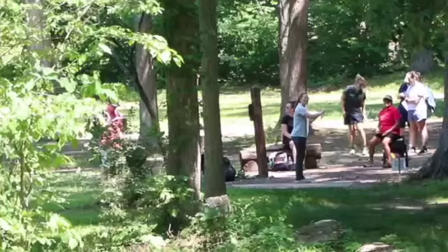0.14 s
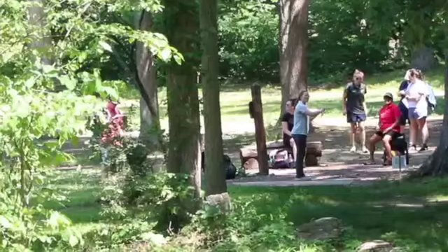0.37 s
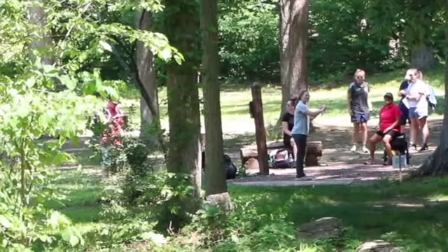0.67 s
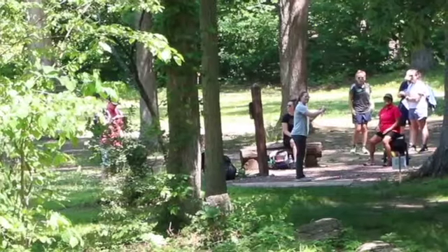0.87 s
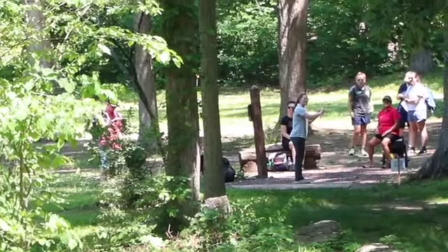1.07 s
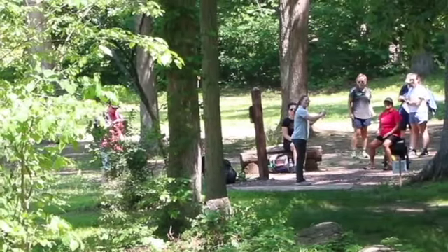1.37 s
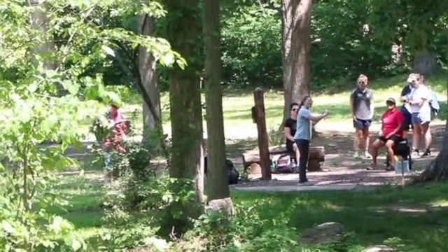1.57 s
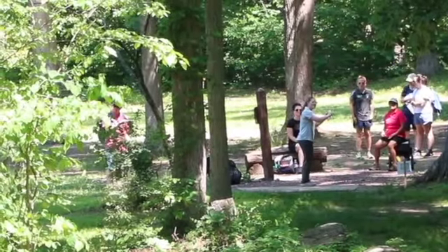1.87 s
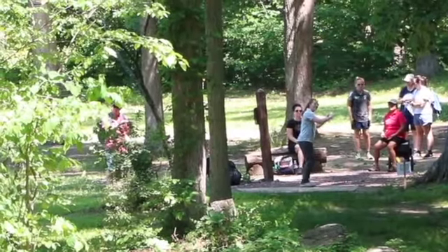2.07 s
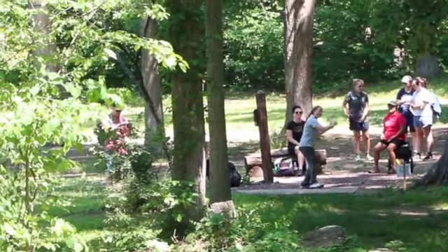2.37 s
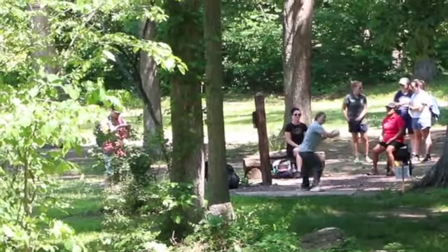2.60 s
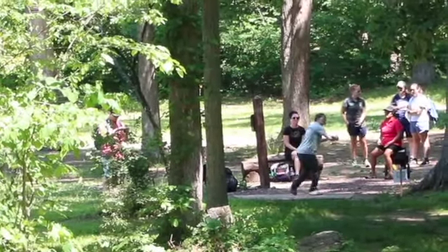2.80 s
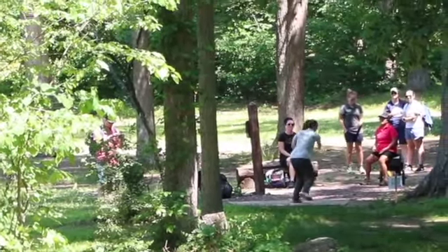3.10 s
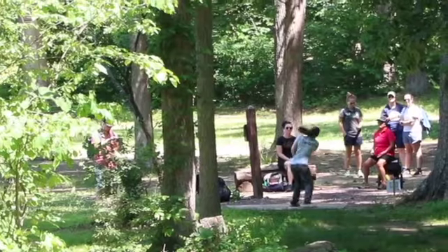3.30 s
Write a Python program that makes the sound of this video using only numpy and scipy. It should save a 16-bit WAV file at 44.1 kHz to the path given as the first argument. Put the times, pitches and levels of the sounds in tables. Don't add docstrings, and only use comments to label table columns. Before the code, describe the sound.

A steady, slightly throbbing cicada chorus fills leafy woods from all sides. Quiet birds chirp on the left, a very faint distant engine swells and fades, and soft rumble lies beneath in an outdoor stereo pickup.

```python
import sys
import numpy as np
from scipy import signal
from scipy.fft import rfft, irfft
from scipy.io import wavfile
from scipy.ndimage import uniform_filter1d

SR = 44100
rng = np.random.default_rng(int(sys.argv[2]) if len(sys.argv) > 2 else 0)


def undo_db(level):
    steps = np.asarray(level, float) / 20
    return 10 ** steps


def persist_wave(psi):
    counts = np.round(np.clip(psi, -1, 1) * 32767).astype(np.int16)
    wavfile.write(sys.argv[1], SR, np.atleast_2d(counts).T)


N = 152145
TIME = np.arange(N) / SR
HZ = np.arange(N // 2 + 1) * SR / N + 1e-3


def level(x, db):
    return x * undo_db(db) / np.sqrt(np.mean(x ** 2))


def ring(hz, width):
    return (1 + 1j * (HZ - hz ** 2 / HZ) / width) ** -2


def walk(rate):
    hold = int(SR / rate)
    values = rng.standard_normal(N // 100 + 2)[:N // hold + 1]
    slewed = uniform_filter1d(np.repeat(values, hold), hold)
    return 1.57 * uniform_filter1d(slewed, hold)[:N]


def leaf_scatter(wet_db):
    t60_s = 0.098
    size = SR // 4
    tail = rng.standard_normal((2, size)) * undo_db(-60 * np.arange(size) / SR / t60_s)
    tail = tail / np.sqrt(np.sum(tail ** 2, axis=1, keepdims=True))
    return undo_db(wet_db) * rfft(tail, N)


def drum_clicks(rate, tone):
    jitter, scatter_db = 0.35, 2.5
    chance = rng.standard_normal((2, 2000))
    at = np.cumsum(np.exp(jitter * chance[0] + 0.1 * tone)) / rate - 0.01
    keep = (at > 0) & (at * SR < N)
    return np.bincount((at[keep] * SR).astype(int), undo_db(scatter_db * chance[1][keep]), N)


def crowd(hz, spread_hz, width, rate, db, throb_db, pan_db, wet_db, count):
    port_lag_s, unison = 0.00025, 0.27
    total = np.zeros((2, len(HZ)), complex)
    leaves = leaf_scatter(wet_db)
    places = rng.permutation(np.linspace(-1, 1, count))
    tones = np.sinh(np.linspace(-1.6, 1.6, count))
    for place, tone in zip(places, tones):
        throbbing = drum_clicks(rate, tone) * undo_db(throb_db * walk(11))
        song = rfft(throbbing) * ring(hz + spread_hz * tone, width)
        lag = np.exp(1j * np.pi * HZ * place * port_lag_s)
        direct = np.array([lag, 1 / lag])
        total += song * (direct + np.roll(leaves, rng.integers(len(HZ)), axis=1))
    pulse = walk(14)
    together = undo_db(throb_db * unison * (pulse - uniform_filter1d(pulse, size=SR // 3)))
    return level(irfft(total, N) * together, db) * undo_db(np.array([[pan_db], [-pan_db]]) / 2)


# belly f/Hz, belly spread/Hz, ring width/Hz, click rate/Hz, level/dB, throb/dB,
# left over right/dB, scattered over direct/dB
DRONE = (1316, 18.5, 110, 140, -24, 1.1, 1.1, -3.5)
DRONE_EDGE = (1302.5, 68.5, 208, 139.5, -28.5, 1, 1, -11)
HUM = (899, 44, 57, 110, -44, 1, 2, -6.5)


def low_cicadas():
    return crowd(*DRONE, count=32) + crowd(*DRONE_EDGE, count=24) + crowd(*HUM, count=14)


# belly f/Hz, belly spread/Hz, ring width/Hz, click rate/Hz, level/dB, throb/dB,
# left over right/dB, scattered over direct/dB
HISS_LOW = (5990, 241, 1196, 420, -41.5, 1.5, 0, 8)
HISS_HIGH = (7929, 351, 1302, 420.5, -39.5, 3, -1.8, 15.5)
HISS_DEEP = (4350, 283, 896, 420, -44, 1.5, -.3, 6)


def hissing_cicadas():
    return crowd(*HISS_LOW, count=14) + crowd(*HISS_HIGH, count=16) + crowd(*HISS_DEEP, count=10)


def whistle(rows):
    s, hz, db = np.array(rows, float).T
    gate = uniform_filter1d(((TIME > s[0]) & (TIME < s[-1])) * 1., size=150)
    phase = 2 * np.pi * np.cumsum(np.interp(TIME, s, hz)) / SR
    return np.sqrt(2) * gate * undo_db(np.interp(TIME, s, db)) * np.sin(phase)


# t/s, f/Hz, level/dB
PHRASES = [
    [(1.698, 4700, -56), (1.706, 3600, -46), (1.718, 3050, -47), (1.73, 2830, -47), (1.742, 3150, -45),
     (1.754, 3900, -44), (1.775, 3980, -51), (1.825, 3950, -54)],
    [(1.83, 5000, -55), (1.838, 3900, -44), (1.847, 3550, -39), (1.856, 3700, -56), (1.866, 3200, -48),
     (1.876, 2850, -45), (1.888, 3700, -45), (1.904, 4250, -50)],
    [(1.97, 2700, -48), (1.99, 2620, -44), (2.002, 2470, -42), (2.012, 2250, -52), (2.02, 2500, -46),
     (2.035, 3050, -37), (2.054, 3580, -37), (2.062, 4150, -48)],
    [(2.064, 3800, -50), (2.071, 3050, -40), (2.088, 2300, -46), (2.1, 2310, -46), (2.115, 2430, -40),
     (2.135, 2560, -45), (2.152, 2470, -54), (2.18, 2500, -45), (2.222, 2440, -53)],
    [(3.386, 5100, -52), (3.393, 4200, -43), (3.402, 3350, -39), (3.412, 2700, -44), (3.425, 3100, -36),
     (3.438, 3650, -36), (3.45, 4400, -41)],
]


def songbird():
    return sum(whistle(rows) for rows in PHRASES)


# t/s, length/s, start f/Hz, end f/Hz, level/dB
FAR_NOTES = [(.035, .05, 3250, 2950, -53), (.48, .09, 2180, 2320, -53), (.68, .1, 2760, 2750, -55),
             (.85, .05, 3250, 2980, -52), (1.35, .1, 2130, 2270, -52), (1.54, .06, 2260, 2220, -53),
             (1.81, .05, 3250, 2950, -50), (1.88, .02, 2350, 2150, -49), (2.89, .06, 2750, 2750, -56),
             (3.075, .02, 2350, 2380, -51), (3.1, .05, 2750, 2720, -55), (3.264, .02, 2350, 2380, -46),
             (3.284, .016, 2800, 2820, -47), (3.39, .03, 2100, 1980, -52)]


def far_birds():
    song = 0
    for s, length, start_hz, end_hz, db in FAR_NOTES:
        bend = (s + 0.388 * length, 0.37 * start_hz + 0.6 * end_hz, db)
        song = song + whistle([(s, start_hz, db - 5), bend, (s + length, end_hz, db)])
    return song


def birds_among_trunks():
    right_db, lag, wet_db, t60_s = -14, 6, -7, 0.65
    song = (songbird() + far_birds()) * undo_db(5 + 0.5 * walk(70))
    t = np.arange(SR) / SR
    tail = rng.standard_normal((2, SR)) * undo_db(-60 * t / t60_s) * np.clip(t / 0.013, 0, 1)
    wet = signal.fftconvolve(song[None], level(tail, 0) / np.sqrt(SR), axes=1)[:, :N]
    direct = np.array([song, undo_db(right_db) * np.pad(song, (lag, 0))[:N]])
    return direct + undo_db(wet_db) * wet


# t/s, centre f/Hz, level/dB
ENGINE = [
    (0, 180, -63),
    (0.798, 240, -61),
    (1.05, 330, -55),
    (1.299, 374.8, -53),
    (1.6, 403.6, -56),
    (1.901, 520.5, -66),
    (2.6, 599.4, -64.5),
    (3.45, 661, -81),
]


def engine():
    width_hz = 126
    s, hz, db = np.array(ENGINE, float).T
    slow = irfft(rfft(rng.standard_normal((2, 2, N))) / (1 + (2 * HZ / width_hz) ** 2), N)
    turn = 2 * np.pi * np.cumsum(np.interp(TIME, s, hz)) / SR
    mid, side = level(slow[0] * np.cos(turn) + slow[1] * np.sin(turn), 0)
    return (mid + 0.22 * side * np.array([[1], [-1]])) * undo_db(np.interp(TIME, s, db))


# f/Hz, level/dB (per Hz)
AIR = [(25, -7), (40, -11.5), (85, -1), (200, -6), (500, -11.5), (2700, -7.5), (3250, -17), (9500, -12)]


def air():
    top_db_oct, alike_hz = -42, 700
    hz, db = np.array(AIR).T
    octave = np.log2(HZ)
    above_top = np.clip(octave - np.log2(hz[-1]), 0, 2)
    colour = undo_db(np.interp(octave, np.log2(hz), db) + top_db_oct * above_top)
    alike = 1 / (1 + HZ / alike_hz) ** 1.5
    mid, side = rfft(rng.standard_normal((2, N)))
    both = colour * (np.sqrt(1 + alike) * mid + np.array([[1], [-1]]) * np.sqrt(1 - alike) * side)
    out = 0
    for centre in np.arange(4, 15):
        zone = np.clip(1 - np.abs(octave - centre), 0, 1)
        swell = undo_db(0.37 * walk(2.79) + 0.3 * walk(12))
        out = out + irfft(both * zone, N) * swell
    return level(out, -42.5) * undo_db(np.array([[.4], [-.4]]))


def scene():
    return low_cicadas() + hissing_cicadas() + birds_among_trunks() + engine() + air()


# f/Hz, width/Hz, depth (0-1)
TREBLE_DIPS = [(11290, 240, .45), (15190, 200, .97)]


def dip_treble(sound):
    dips = 1 - sum(depth * ring(hz, width).real for hz, width, depth in TREBLE_DIPS)
    return irfft(rfft(sound) * dips, N)


def roll_off(x):
    return signal.sosfilt(signal.butter(12, 15770, fs=SR, output="sos"), x)


def record(dry):
    mix = dip_treble(dry)
    return roll_off(mix)


dry = scene()
out = record(dry)
persist_wave(out)
```